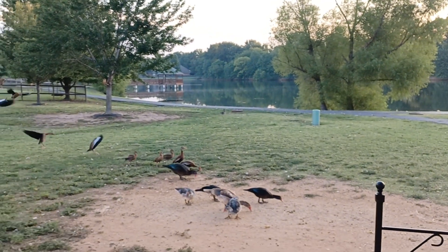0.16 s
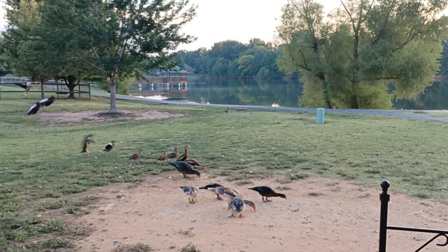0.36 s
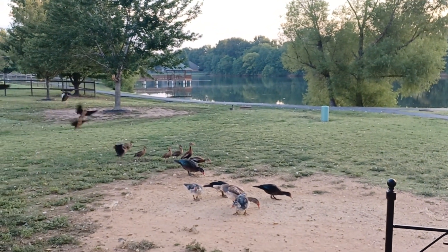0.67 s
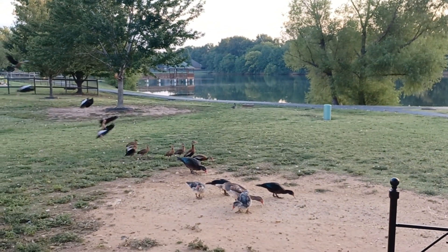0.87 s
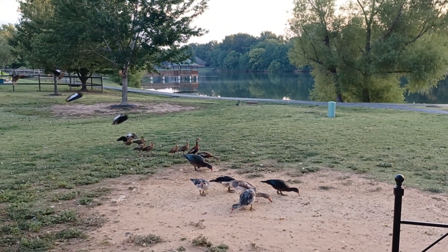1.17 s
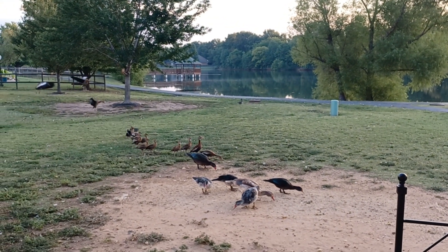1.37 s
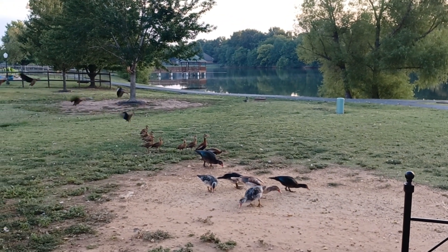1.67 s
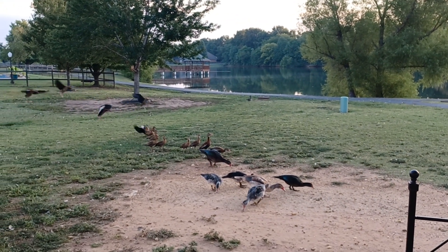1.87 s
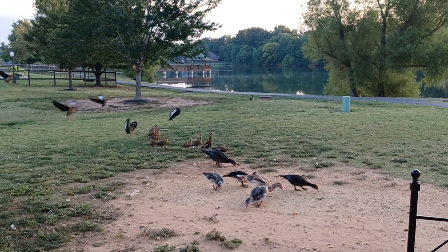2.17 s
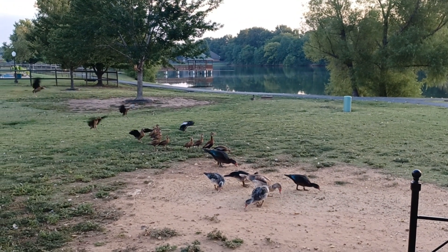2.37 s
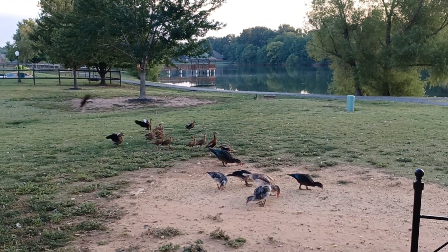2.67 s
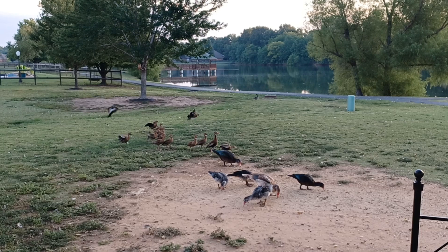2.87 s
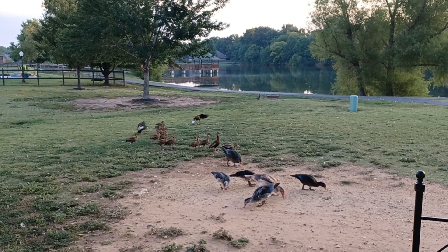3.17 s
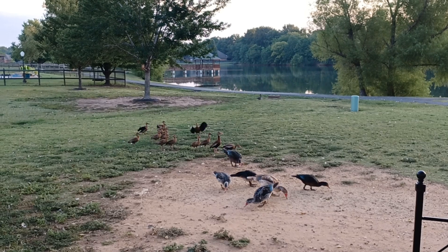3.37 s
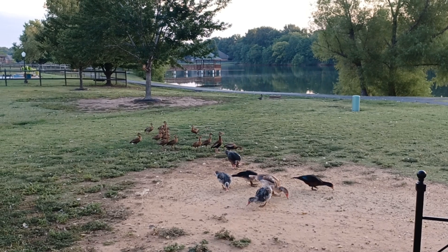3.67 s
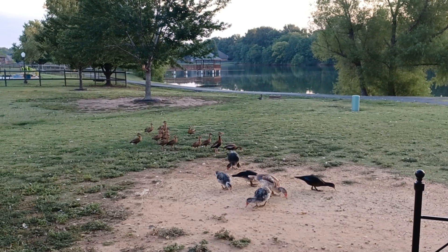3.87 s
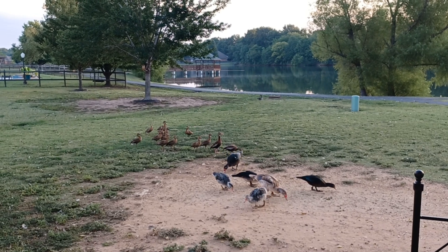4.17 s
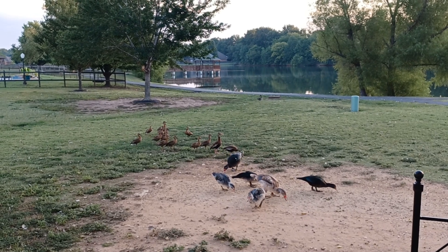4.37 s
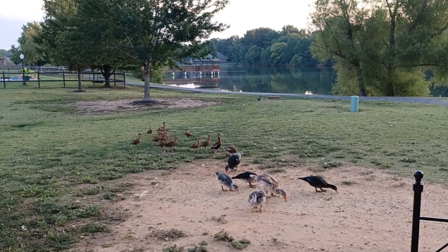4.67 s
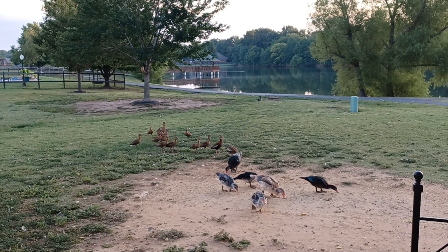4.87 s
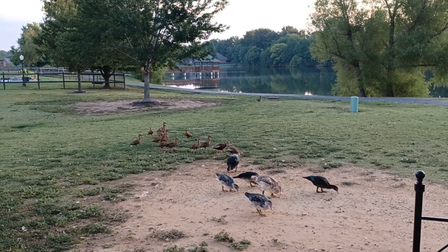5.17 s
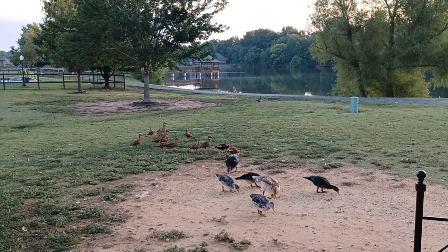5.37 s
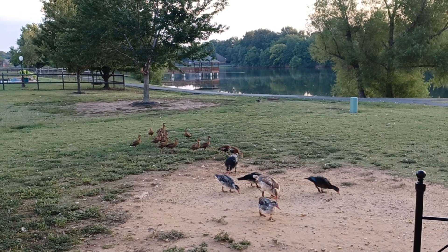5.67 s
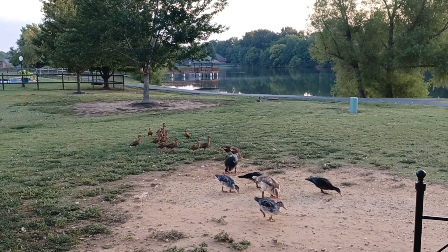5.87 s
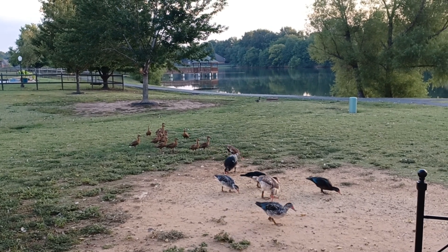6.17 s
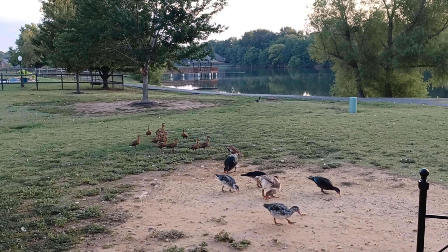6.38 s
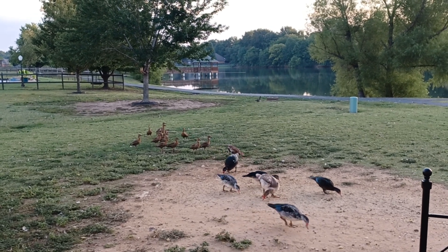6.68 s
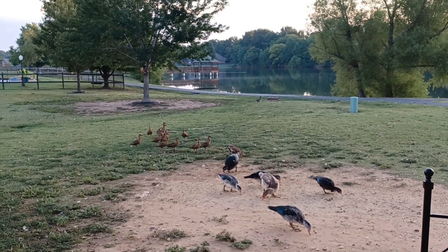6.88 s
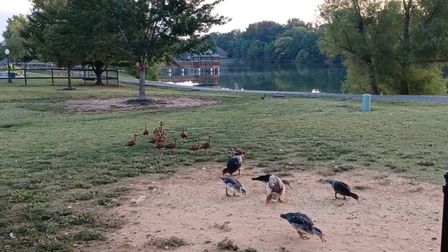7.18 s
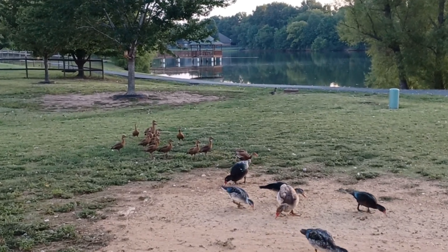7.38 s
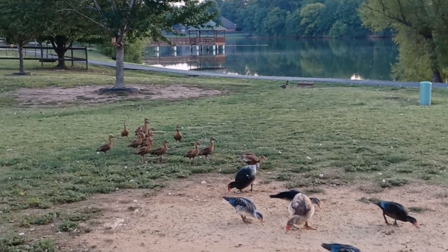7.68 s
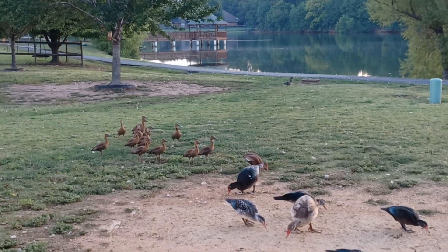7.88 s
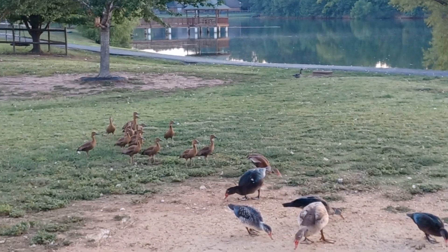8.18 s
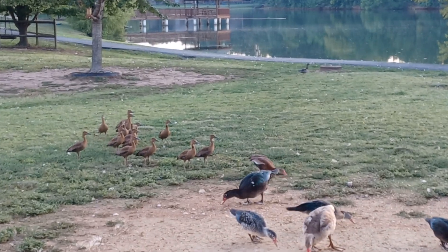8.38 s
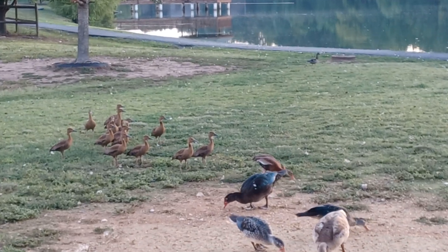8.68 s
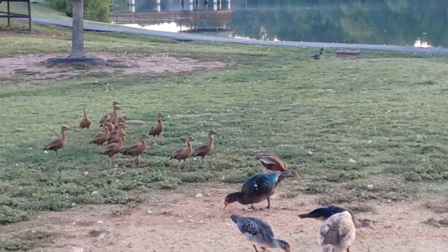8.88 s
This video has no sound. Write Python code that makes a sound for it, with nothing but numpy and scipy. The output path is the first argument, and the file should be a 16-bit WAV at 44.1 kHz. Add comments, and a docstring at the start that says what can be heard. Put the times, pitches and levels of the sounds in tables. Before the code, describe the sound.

A low engine hum and muffled road noise run throughout, wavering gently with a faint thin whine. Small crisp clicks and brief rustling strokes sit very near the right side of a stereo microphone. Now and then a duck whistles a tiny arched peep, a little rough at its crest, leaning right with a light open-air echo. Far tyres hiss by softly past the middle; one muted knock comes late.

```python
"""A low engine drone under traffic rumble is heard first, from far off; dry ticks soon join it in the right port.
Whistling ducks on a lakeside lawn then give thin, arched peeps: harmonic voices with a hoarse crest and echoes.
Fainter whistles from farther birds are gliding sines; ticks and rustles are shaped bursts of noise.
The drone is a few firing orders, the traffic filtered noise; a far vehicle swells past and a dull tap falls late."""
import sys
import numpy as np
from scipy import signal
from scipy.fft import rfft, irfft, next_fast_len
from scipy.io import wavfile
from scipy.ndimage import uniform_filter1d, map_coordinates

SR = 44100
rng = np.random.default_rng(int(sys.argv[2]) if len(sys.argv) > 2 else 0)


def digitize_waveform(pressure):
    """Quantize a signal to 16-bit integers and store it at the path in sys.argv[1].

    Rows of a 2-D input are taken as channels; values are limited to [-1, 1].
    """
    field = np.atleast_2d(pressure).T
    bounded = np.clip(field, -1, 1)
    quanta = np.round(bounded * 32767).astype(np.int16)
    wavfile.write(sys.argv[1], SR, quanta)


N = 397771

# near duck peeps, level before the arch and hoarseness act; the second voice is centred, pan is left minus right:
# start_s, length_s, top_pitch_hz, level_db, falling_side_db, upper_overtones_db,
# second_voice_hz, second_voice_db, second_voice_decay_s, pan_db, hoarseness (relative)
DUCK_PEEPS = [(2.259, 0.061, 2665, -44.5, 0, -9, 2910, -52, .018, -7, 1.15),
              (2.726, 0.067, 2615, -45, -1, -13, 2870, -55, .022, -7, 0.9),
              (4.904, 0.06, 2535, -46.5, -3, -15, 2700, -51.5, .008, -9, 0.25),
              (7.198, 0.058, 2545, -45.5, 0, -19, 3040, -52, .008, -10, 0.3)]
# course of one peep: share_of_length (0-1), share_of_top_pitch (0-1), level_db
PEEP_ARCH = [(0, .77, -14), (.18, .825, -9), (.31, .89, -1), (.48, .975, 0), (.62, 1, 0), (.74, .98, 0),
             (.85, .91, 0), (1, .78, -14)]
# band in which the peeps are weak, applied to the whole voice: frequency_hz, gain_db
PEEP_DIP = [(7700, -1), (8300, -12), (9200, -10), (9900, 3)]
# throat resonance: centre, half width, and gain span at hoarseness 1
THROAT_HZ, THROAT_WIDTH_HZ, THROAT_DB = 4650, 280, 4.5
PEEP_JITTER_RAD = .36  # phase jitter at hoarseness 1
SLAP_S, SLAP_DB = .052, -13.5  # one distinct reflection of the peeps
# diffuse echo from trees and lawn: frequency_hz, t60_s
PARK_DECAY = [(2000, 0.2), (5000, 0.18), (10000, 0.13)]

# whistles from farther birds, level before flicker: start_s, length_s, first_hz, middle_hz, last_hz, level_db
FAR_WHISTLES = [(3.035, 0.08, 2950, 3120, 3170, -68), (3.085, 0.25, 3165, 3035, 2925, -65.5),
                (6.724, 0.068, 2360, 2800, 2720, -55.5)]
WHISTLE_FADE_S = 0.014  # attack and release

# clearest dry ticks at the right port, body relative to the snap: start_s, peak_db, lower_body_db
LOUD_TICKS = [(0.325, -37, -20), (0.47, -41, -20), (1.162, -34, -20), (1.242, -41, -20), (1.699, -32, -10),
              (3.044, -34, -20), (3.989, -36, -16), (4.021, -39, -20), (4.081, -41, -20), (4.413, -34, -9),
              (4.422, -30, -3), (4.613, -36, -22), (4.7, -35, -3), (4.906, -31, -13), (4.912, -35, -12),
              (4.992, -40, -20), (5.071, -39, -16), (5.149, -38, -16), (5.373, -38, -20), (5.403, -37, -9),
              (5.408, -35, -11), (5.472, -33, -14), (5.513, -36, -16), (6.015, -37, -20), (7.362, -36, -16),
              (7.88, -39, -20), (8.231, -29.5, -32)]
# spectrum of the tick's snap, and of rustle grains: frequency_hz, gain_db
TICK_SPECTRUM = [(2500, -40), (4800, -4), (7000, -11), (8600, -11), (10000, -2), (12500, 2.5),
                 (14500, -4.5), (16000, -14)]
# spectrum of the tick's lower body: frequency_hz, gain_db
TICK_BODY_SPECTRUM = [(1500, -30), (3500, -6), (4900, 4), (6800, -7), (9000, -16), (12000, -40)]
# rustling strokes, level before the stroke's trim: middle_s, length_s, level_db
RUSTLE_STROKES = [(1.68, .1, -55), (3.985, 0.071, -57), (4.08, .05, -56), (4.193, .08, -53),
                  (4.303, .06, -58), (4.408, .06, -51), (4.495, .07, -54), (4.6, .07, -52),
                  (4.692, 0.078, -51), (4.812, 0.061, -57), (4.909, 0.063, -56), (4.993, 0.076, -55),
                  (5.082, .04, -53), (5.17, .06, -56), (5.27, 0.052, -54), (6.32, 0.037, -57),
                  (6.415, .06, -55), (6.621, 0.045, -51), (6.722, .06, -55), (6.9, 0.052, -55),
                  (7.005, 0.12, -55), (7.115, .09, -50), (7.513, 0.084, -57), (7.632, .05, -60),
                  (7.75, .08, -61), (8.22, 0.069, -57), (8.315, .05, -52), (8.79, 0.084, -58)]
# spectrum of the fine hiss: frequency_hz, gain_db
HISS_SPECTRUM = [(3000, -11), (4500, 4.5), (6500, -0.5), (8300, -10), (9800, 2.5), (12500, 4.5), (14200, 0),
                 (15700, -7)]

# soft far tap: moment, centre and starting level
TAP_S, TAP_HZ, TAP_DB = 7.969, 2600, -47

# firing rate of the distant engine: time_s, rate_hz
FIRING_RATE = [(0, 84.46), (3, 84.17), (7, 84.3), (9, 84.46)]
# level of its firing tone, before trim and waver: time_s, level_db
FIRING_TONE_LEVEL = [(0.0, -28.5), (0.6, -26.5), (1.25, -27.5), (1.55, -23.5), (2.4, -25.5), (4.0, -25.5),
                     (4.25, -23), (5.4, -23), (6.2, -24.5), (7.1, -21.5), (8.25, -21.5), (9.02, -24.5)]
# level of the octave above, before trim and waver: time_s, level_db
OCTAVE_LEVEL = [(0.0, -37.5), (2.2, -37.5), (2.85, -33), (3.9, -45), (4.2, -33.5), (4.95, -36), (5.35, -47),
                (7.3, -38), (8.25, -46), (8.6, -35.5), (9.02, -35)]
# weaker overtones, before waver: multiple_of_firing_rate (whole number), level_db
ENGINE_OVERTONES = [(3, -47.5), (4, -59.5)]

# one far vehicle: nearest moment, time to cover its own distance, roar and tyre song when nearest
PASS_S, PASS_WIDTH_S, PASS_ROAR_DB, PASS_SONG_DB = 5.39, 0.84, -43, -41
# bands in which its tyres sing: centre_hz, half_width_hz, gain_db
TYRE_BANDS = [(733, 46, -4), (903, 17, -1.5), (1155, 190, -9)]
# spectrum of tyre roar, far roads and vehicle alike: frequency_hz, gain_db
ROAR_SPECTRUM = [(200, -29), (400, -5.5), (600, 1), (750, 0.5), (1000, -1), (1300, -5.5), (1750, -12),
                 (2100, -17.5), (2600, -25.5), (4000, -64), (8000, -120)]
ROAR_DB, ROAR_DB_PER_S = -42, 0.1026  # starting level of the far roads before drift, and their slow growth

# spectrum of the deep rumble: frequency_hz, gain_db
DEEP_SPECTRUM = [(20, -30), (52, -20.5), (62, -14.5), (72, -1.5), (105, 3), (128, -5), (155, -1),
                 (185, -10.5), (260, -23.5), (350, -21.5), (900, -120)]
DEEP_DB = -36  # before waver
# spectrum of the upper rumble: frequency_hz, gain_db
RUMBLE_SPECTRUM = [(130, -21), (190, -2), (225, 0.5), (255, -3), (272, -5.5), (295, -15), (335, -11.5),
                   (365, -17.5), (410, -10.5), (445, -31), (480, -12.5), (520, -33.5), (1500, -120)]
# level of the upper rumble, before trim and waver: time_s, level_db
RUMBLE_LEVEL = [(0.0, -34.5), (0.45, -38), (3.9, -36), (5.0, -34), (6.7, -34.5), (7.2, -35), (7.6, -41.5),
                (8.35, -33), (9.02, -36)]
# lower band of the far whine: centre_hz, half_width_hz, gain_db
LOWER_WHINE_BANDS = [(528.8, 18.5, 9), (555, 12, -2)]
# its level, before trim and waver: time_s, level_db
LOWER_WHINE_LEVEL = [(0.0, -36.5), (0.398, -46), (1.0, -43), (1.4, -47.5), (2.0, -44), (2.5, -42.5),
                     (3.3, -42), (4.3, -47), (7.3, -55), (9.02, -48.5)]
# upper band of the far whine: centre_hz, half_width_hz, gain_db
UPPER_WHINE_BANDS = [(632.5, 13, 0), (655, 14, 0)]
UPPER_WHINE_DB = -50.5  # before waver
# faint steady hum below the whine: centre_hz, half_width_hz, gain_db
HUM_BANDS = [(480.4, 3.3, 0)]
HUM_DB = -59
# two thin tones of far machinery, before waver: time_s, lower_hz, lower_db, higher_hz, higher_db
WHINE_LINES = [(0, 623, -47, 634, -61), (0.42, 623, -49, 646, -59), (0.62, 624, -44.5, 642, -75),
               (1.05, 626, -45.5, 643, -45), (1.2, 624, -55, 648, -57), (2.45, 622, -56, 633, -60),
               (2.72, 622, -51, 638, -43), (3.15, 622, -65, 637.5, -57), (3.47, 623, -49, 642, -40),
               (3.65, 621, -52, 641, -52), (4.1, 619, -45, 640, -47), (4.75, 617, -65, 639, -57),
               (5.15, 617, -42, 646, -60), (5.7, 617, -58, 653, -48), (6.8, 612, -64, 663, -51.5),
               (7.5, 610, -61, 662.6, -64), (9.02, 610, -47, 657.5, -49.5)]
# spectrum of the treble haze: frequency_hz, gain_db
HAZE_SPECTRUM = [(1200, 4.5), (2500, -2), (3000, 4), (3500, 3.5), (4500, 2), (5250, 5.5), (5800, -2),
                 (6800, -1.5), (8200, -7)]
HAZE_TOP_HZ = 8800

# likeness of the two spaced ports, negative where sound reaches them half a wave apart:
# frequency_hz, correlation (-1 to 1)
PORT_LIKENESS = [(120, 0.99), (175, 0.94), (220, 0.67), (300, 0.34), (390, 0.096), (520, 0.77), (660, 0.33),
                 (830, -0.32), (1230, -0.63), (1850, 0.3), (2300, 0.23), (2800, -0.49), (4000, -0.026)]
TOP_HZ = 15760  # band limit of the recorder


def amp(db):
    """Decibels to gain."""
    return 10 ** (np.asarray(db) / 20)


def unit(x):
    """x at rms 1."""
    return x / np.sqrt(np.mean(x ** 2) + 1e-20)


def along(points, hz):
    """(frequency_hz, value) points read on a log frequency axis."""
    f, v = np.transpose(points)
    return np.interp(np.log(hz + 1), np.log(f + 1), v)


def curves(rows):
    """One value per sample for each column after the time."""
    s, *columns = np.transpose(rows)
    return [np.interp(np.arange(N) / SR, s, column) for column in columns]


def wobble(rate):
    """A smooth random curve of rms 1, rate knots a second."""
    knots = rng.standard_normal(int(N * rate / SR) + 4)
    return unit(map_coordinates(knots, [np.arange(N) * rate / SR]))


def filtered(x, response):
    """x times a response of frequency, padded so that nothing wraps round."""
    n = x.shape[-1]
    m = next_fast_len(n + SR // 4)
    return irfft(rfft(x, m) * response(np.fft.rfftfreq(m, 1 / SR)), m)[..., :n]


def coloured(x, spectrum):
    """x shaped by (frequency_hz, gain_db) points."""
    return filtered(x, lambda hz: amp(along(spectrum, hz)))


def outdoor_noise():
    """White noise from all around; mid and side shares set how alike the two spaced ports are."""
    def mid_and_side(hz):
        turn = np.arccos(np.clip(along(PORT_LIKENESS, hz), -1, 1)) / 2
        return np.array([np.cos(turn), np.sin(turn)])

    mid, side = filtered(rng.standard_normal((2, N)), mid_and_side)
    return np.array([mid + side, mid - side])


def narrow_bands(bands):
    """Outdoor noise of rms 1 gathered in resonance-shaped bands."""
    def response(hz):
        return sum(amp(db) / (1 + ((hz - centre) / width) ** 2) for centre, width, db in bands)

    return unit(filtered(outdoor_noise(), response))


def add(track, s, sound):
    """Mix a sound into a track at s seconds."""
    part = track[..., max(round(s * SR), 0):][..., :sound.shape[-1]]
    part += sound[..., :part.shape[-1]]


def ducks(rasp_jitter_rad=0.49, choke_db=-6.0, fundamental_db=-12.5, fourth_db=-8, rasp_width=0.2):
    """Each peep arches in pitch; its second harmonic flares twice as it crosses the throat resonance."""
    out = np.zeros((2, N))
    share, pitch, arch_db = np.transpose(PEEP_ARCH)
    for (s, length, top_hz, db, fall_db, upper_db,
         rasp_hz, rasp_db, linger_s, pan_db, hoarseness) in DUCK_PEEPS:
        t = np.arange(SR // 6) / SR
        u = t / length
        hz = top_hz * uniform_filter1d(np.interp(u, share, pitch), size=300, mode="nearest")
        # around the top of the arch the voice turns hoarse and loses some strength
        past_crest = u - .64
        crest = np.exp(-(past_crest / rasp_width) ** 2)
        flutter = unit(uniform_filter1d(rng.standard_normal((3, len(u))), size=36))
        jitter = PEEP_JITTER_RAD * hoarseness * crest * flutter[0]
        phase = 2 * np.pi * np.cumsum(hz) / SR + jitter
        resonance = 1 / (1 + ((2 * hz - THROAT_HZ) / THROAT_WIDTH_HZ) ** 2)
        throat = amp(hoarseness * THROAT_DB * (resonance - .5))
        choke = amp(choke_db * hoarseness * crest)
        voice = amp(fundamental_db) * (1 + .5 * crest * flutter[2]) * np.sin(phase)
        voice += choke * throat * np.sin(2 * phase)
        voice += choke * amp(upper_db) * (np.sin(3 * phase) + amp(fourth_db) * np.sin(4 * phase))
        voice *= amp(db + np.interp(u, share, arch_db) + fall_db * (past_crest > 0) * (1 - crest))
        voice *= np.clip(20 * np.minimum(u, 1 - u), 0, 1)
        # there a rough second voice breaks in just above the fundamental, and may outlast the peep
        rasp = np.sin(2 * np.pi * rasp_hz * t + rasp_jitter_rad * hoarseness * flutter[1])
        rasp *= 1 + 0.53 * flutter[2]
        dying = np.exp(-np.abs(past_crest) * length / linger_s)
        rasp *= amp(rasp_db) * np.where(past_crest < 0, crest ** 2, dying)
        add(out, s, voice * amp([[pan_db / 2], [-pan_db / 2]]) + rasp)
    return coloured(out, PEEP_DIP)


def park(x, delay_s=0.011):
    """A thin diffuse echo, different at each port: noise whose treble dies sooner."""
    hz, t, z = signal.stft(rng.standard_normal((2, SR // 2)), SR, nperseg=256)
    decay = amp(-60 * t / along(PARK_DECAY, hz)[:, None])
    tail = signal.istft(z * decay, SR, nperseg=256)[1]
    late = np.pad(x, (int(delay_s * SR), 0))[None]
    return signal.fftconvolve(late, tail / np.linalg.norm(tail[0]), axes=1)[:, :N]


def far_whistles(waver=.005, flicker_db=3.5):
    """Nearly pure gliding notes from birds farther off; they waver and flicker on the way."""
    out = np.zeros(N)
    for s, length, first_hz, middle_hz, last_hz, db in FAR_WHISTLES:
        u = np.linspace(0, 1, int(length * SR))
        glide = np.polyfit([0, .5, 1], [first_hz, middle_hz, last_hz], 2)
        hz = np.polyval(glide, u) * (1 + waver * wobble(260)[:len(u)])
        fade = np.clip(np.minimum(u, 1 - u) * length / WHISTLE_FADE_S, 0, 1)
        level = amp(db + flicker_db * wobble(115)[:len(u)])
        add(out, s, level * fade * np.sin(2 * np.pi * np.cumsum(hz) / SR))
    return out


def crackle(tick_t60_s=0.0091, tail_db=-19, tail_t60_s=0.084, small_db=-43, port_delay_s=.00042):
    """Sharp noise ticks, grainy rustles and a fine hiss, almost all in the right port."""
    right, t = rustling(), np.arange(SR // 16) / SR
    # small, thin ticks fall at random between the loud ones
    small = [(when * N / SR, small_db - 8 * size, -20) for when, size in rng.random(size=(50, 2))]
    for s, peak_db, body_db in list(LOUD_TICKS) + small:
        noise = rng.standard_normal(len(t))
        snap = unit(coloured(noise, TICK_SPECTRUM))
        snap += amp(body_db) * unit(coloured(noise, TICK_BODY_SPECTRUM))
        snap *= amp(-60 * t / tick_t60_s) + amp(tail_db - 60 * t / tail_t60_s)
        add(right, s, amp(peak_db) * snap / np.abs(snap).max())
    # the left port hears it later and much more weakly
    left = amp(-20) * np.pad(right, (int(port_delay_s * SR), 0))[:N]
    # the fine hiss is unrelated from port to port
    hiss = unit(coloured(rng.standard_normal((2, N)), HISS_SPECTRUM))
    hiss *= amp(-57.5 + 0.92 * wobble(12))
    return np.array([left, right]) + hiss * amp([[-19], [0]])


def rustling(grain_db=5.0, linger_db=-13):
    """Short grainy strokes, often in quick runs; each swells and fades over a fainter, longer crackle."""
    flow = np.zeros(N)
    for middle_s, length, db in RUSTLE_STROKES:
        add(flow, middle_s - length / 2, amp(db - 2.5) * np.hanning(int(length * SR)))
        add(flow, middle_s - length, amp(db + linger_db) * np.hanning(int(2 * length * SR)))
    grains = rng.standard_normal(N) * amp(grain_db * wobble(1500))
    return flow * unit(coloured(grains, TICK_SPECTRUM))


def tap(width_hz=750, t60_s=0.036):
    """A brief, dull knock: a broad band of noise that decays without a clear ring."""
    out, t = np.zeros((2, N)), np.arange(SR // 8) / SR
    noise = rng.standard_normal((2, len(t)))
    body = filtered(noise, lambda hz: 1 / (1 + ((hz - TAP_HZ) / width_hz) ** 2))
    add(out, TAP_S, amp(TAP_DB - 60 * t / t60_s) * unit(body))
    return out


def engine():
    """Only the lowest firing orders carry this far; moving air makes them waver."""
    (firing_hz,), (tone_db,), (octave_db,) = map(curves, (FIRING_RATE, FIRING_TONE_LEVEL, OCTAVE_LEVEL))
    phase = 2 * np.pi * np.cumsum(firing_hz) / SR
    drone = amp(tone_db - 2.5 + 0.075 * wobble(14)) * np.sin(phase)
    drone += amp(octave_db - 3.0 + 1.57 * wobble(6.5)) * np.sin(2 * phase + 0.053 * wobble(4.6))
    for order, db in ENGINE_OVERTONES:
        drone += amp(db + 2.35 * wobble(3.6)) * np.sin(round(order) * phase + 1.23 * wobble(3))
    return np.sqrt(2) * drone  # so that levels are rms


def vehicle(beaming=2.6):
    """Tyre roar follows 1 / distance; the song of the tyres is beamed and swells more briefly."""
    nearness = 1 / np.hypot(1, (np.arange(N) / SR - PASS_S) / PASS_WIDTH_S)
    roar = amp(PASS_ROAR_DB) * nearness * unit(coloured(outdoor_noise(), ROAR_SPECTRUM))
    return roar + amp(PASS_SONG_DB) * nearness ** beaming * narrow_bands(TYRE_BANDS)


def traffic():
    """Filtered noise: low rumble, wavering whine and tyre roar, over a thin haze of treble."""
    (upper_db,), (lower_whine_db,) = map(curves, (RUMBLE_LEVEL, LOWER_WHINE_LEVEL))
    rumble = amp(DEEP_DB + 0.89 * wobble(12)) * unit(coloured(outdoor_noise(), DEEP_SPECTRUM))
    upper = unit(coloured(outdoor_noise(), RUMBLE_SPECTRUM))
    # the upper rumble leans left, roar and haze slightly right
    rumble += amp(upper_db - 4.0 + 1.02 * wobble(13)) * upper * amp([[1.2], [-1.2]])
    roar_db = ROAR_DB + ROAR_DB_PER_S * np.arange(N) / SR + .4 * wobble(6)
    roar = amp(roar_db) * unit(coloured(outdoor_noise(), ROAR_SPECTRUM)) * amp([[-.5], [.5]])
    whine = amp(lower_whine_db - 2.5 + 0.85 * wobble(4.12)) * narrow_bands(LOWER_WHINE_BANDS)
    whine += amp(UPPER_WHINE_DB + 1.4 * wobble(4.0)) * narrow_bands(UPPER_WHINE_BANDS)
    whine += amp(HUM_DB) * narrow_bands(HUM_BANDS)
    # distance takes away the highest treble
    haze = coloured(outdoor_noise(), HAZE_SPECTRUM)
    haze = filtered(haze, lambda hz: 1 / np.sqrt(1 + (hz / HAZE_TOP_HZ) ** 8))
    air = amp(-55 + 0.095 * wobble(2.2)) * unit(haze) * amp([[-.5], [.5]])
    return rumble + roar + whine + air


def whine_lines(waver_db=1.5, smear_rad=0.66):
    """Two thin tones of far machinery fade in and out; their phase wanders a little apart between ports."""
    low_hz, low_db, high_hz, high_db = curves(WHINE_LINES)
    out = np.zeros((2, N))
    for hz, db in (low_hz, low_db), (high_hz, high_db):
        phase = 2 * np.pi * np.cumsum(hz) / SR + smear_rad * wobble(9)
        level = amp(db + waver_db * wobble(8))
        out += level * np.sin(phase + 0.24 * np.array([wobble(4.5), wobble(4.6)]))
    return out


def scene():
    """Birds and their echoes, close crackle, and the drone of the town behind."""
    peeps, far = ducks(), far_whistles()
    centre = peeps.mean(axis=0)
    slap = amp(SLAP_DB) * np.pad(centre, (int(SLAP_S * SR), 0))[:N]
    birds = peeps + far + slap + park(amp(-7.5) * centre + amp(-8) * far)
    return birds + crackle() + tap() + engine() + vehicle() + traffic() + whine_lines()


def record(dry):
    """The recorder keeps nothing above its band limit."""
    return filtered(dry, lambda hz: hz < TOP_HZ)


dry = scene()
out = record(dry)
digitize_waveform(out)
```